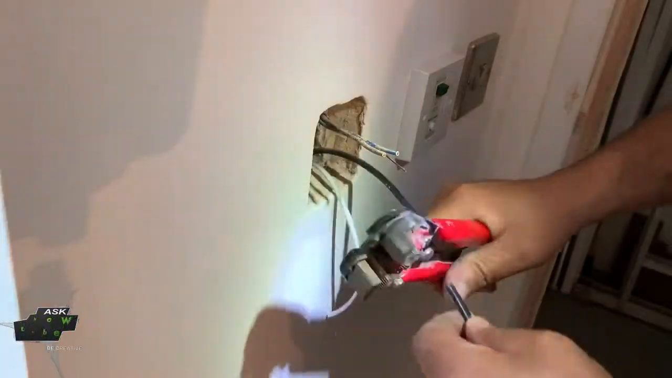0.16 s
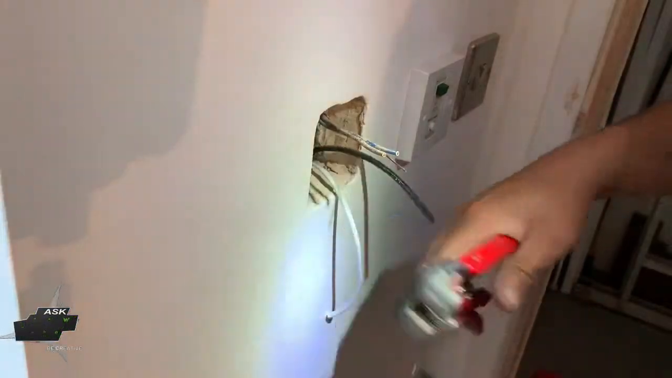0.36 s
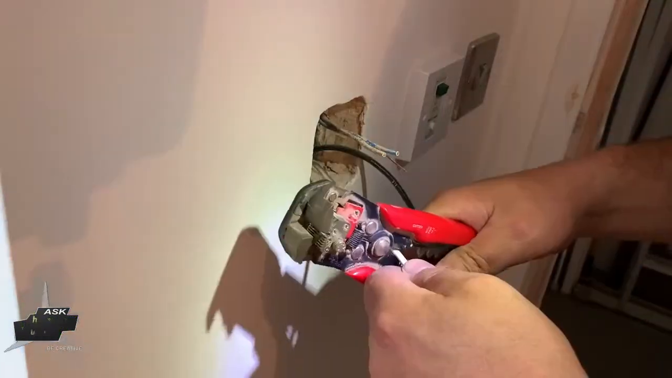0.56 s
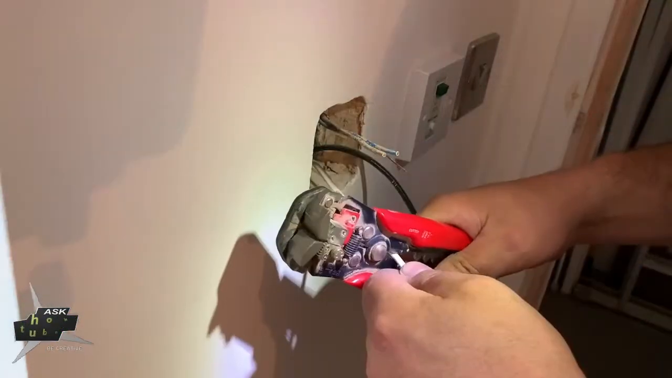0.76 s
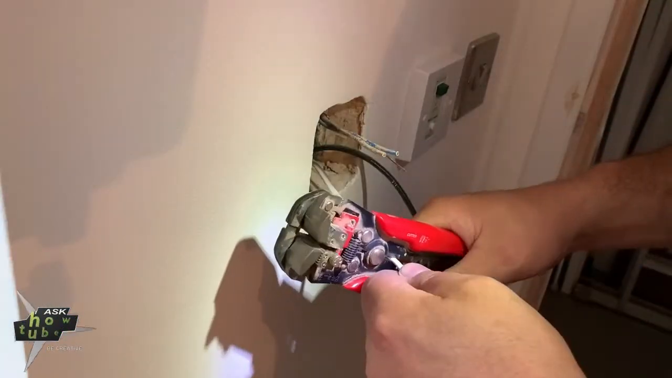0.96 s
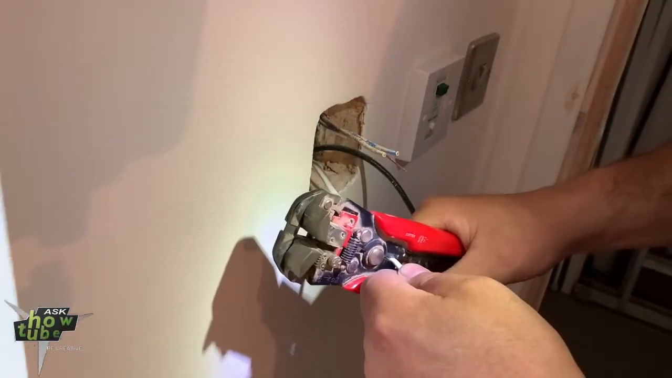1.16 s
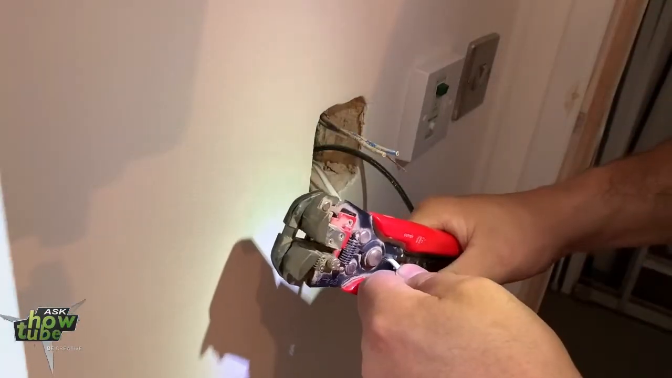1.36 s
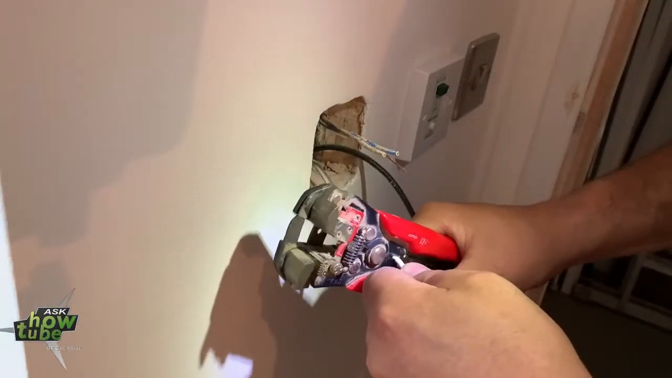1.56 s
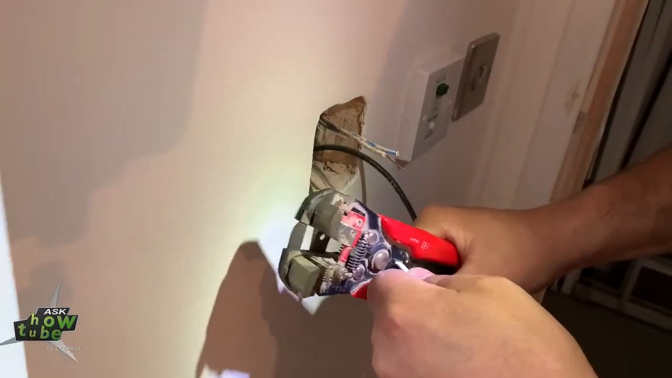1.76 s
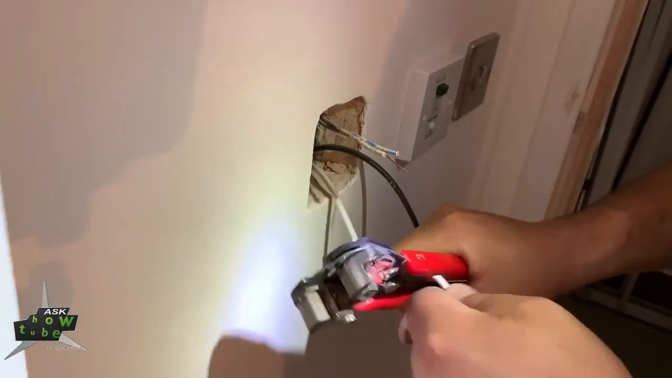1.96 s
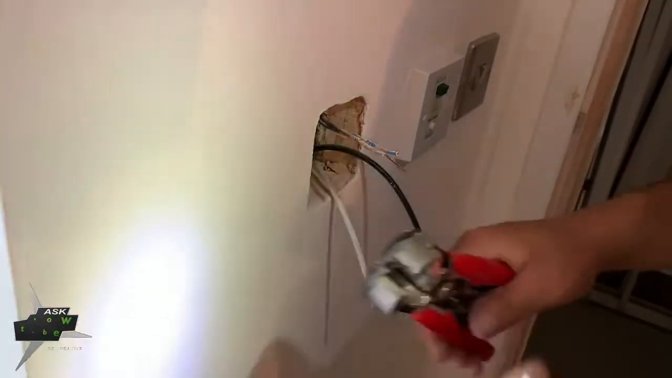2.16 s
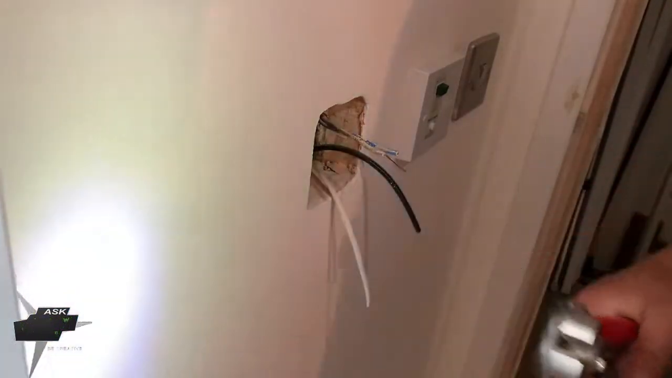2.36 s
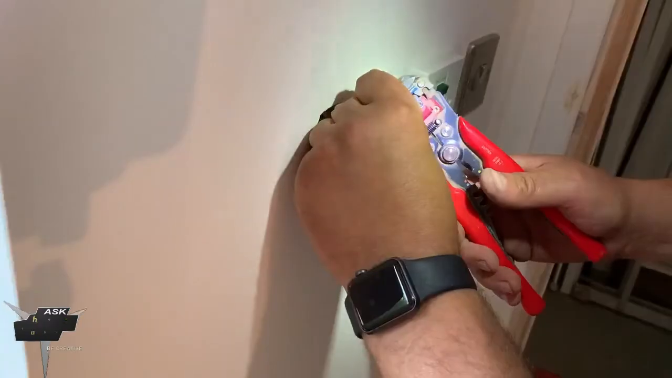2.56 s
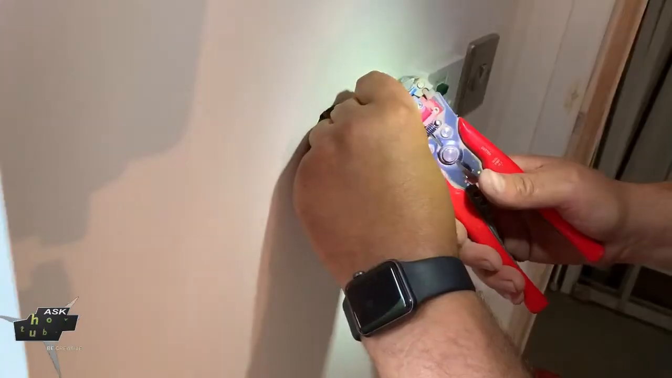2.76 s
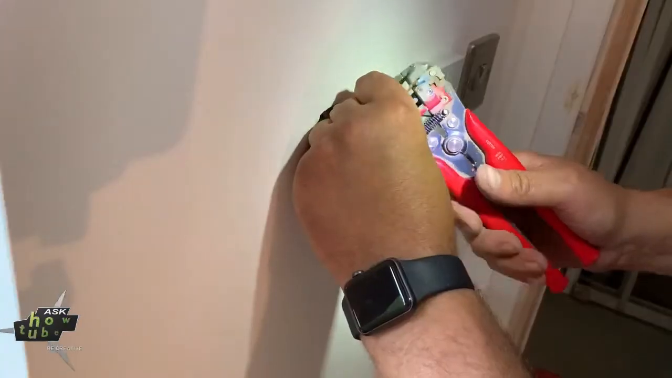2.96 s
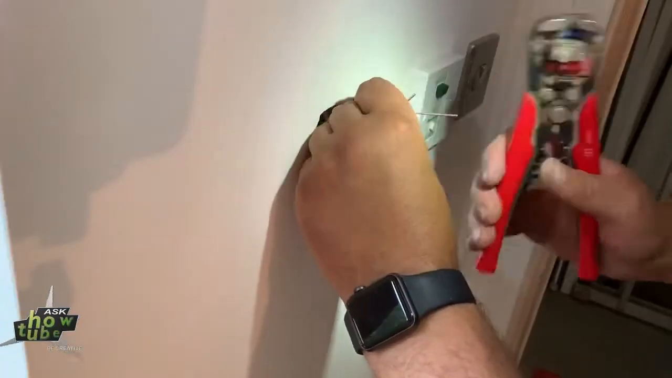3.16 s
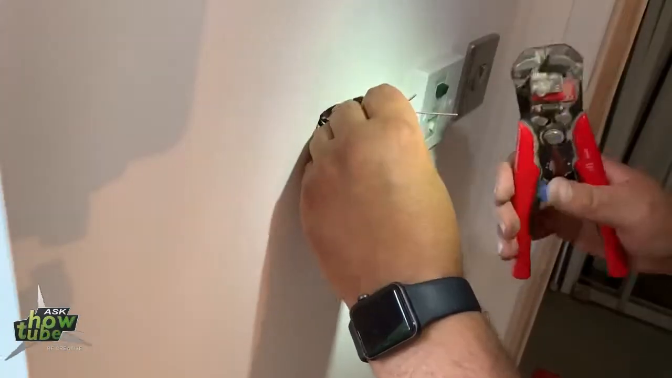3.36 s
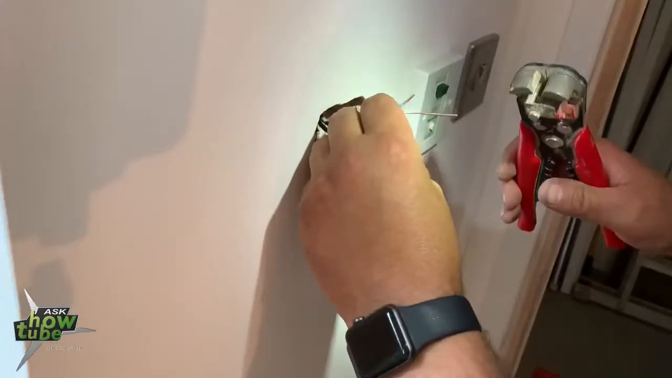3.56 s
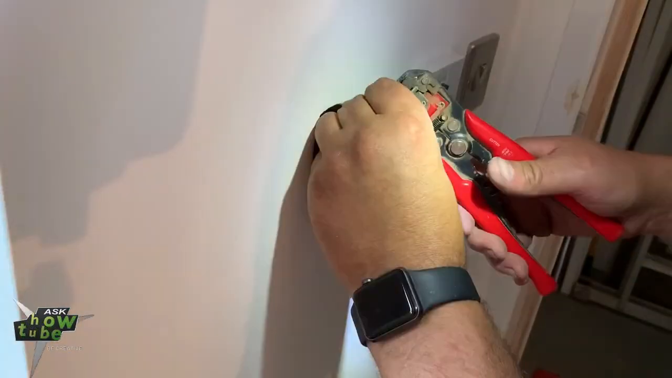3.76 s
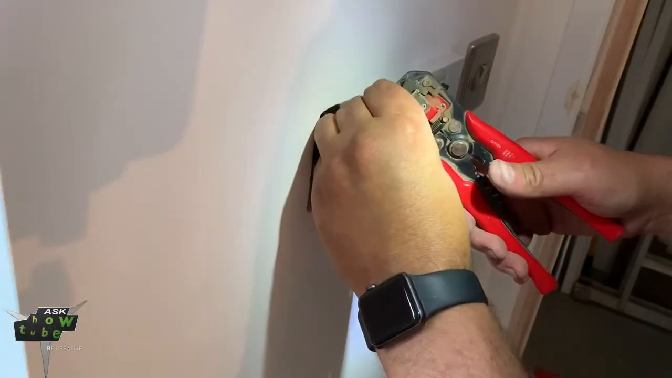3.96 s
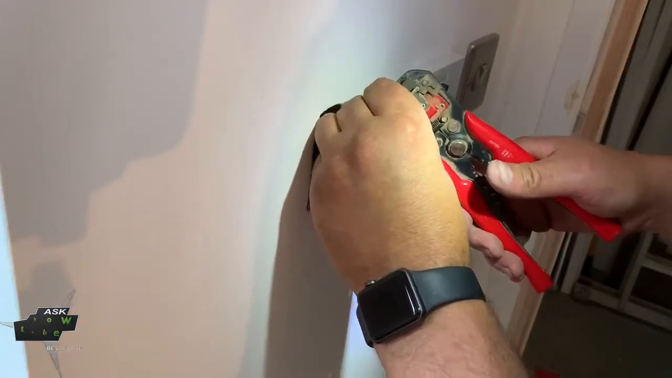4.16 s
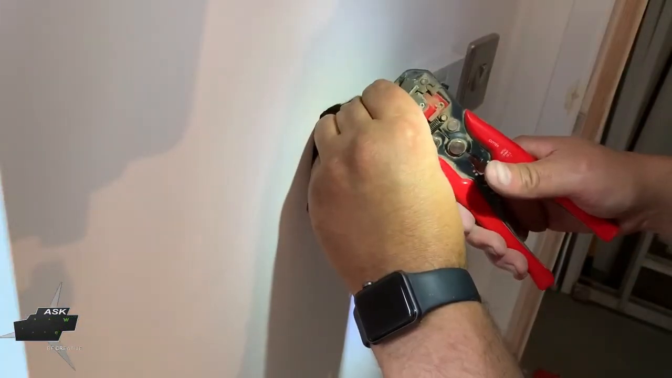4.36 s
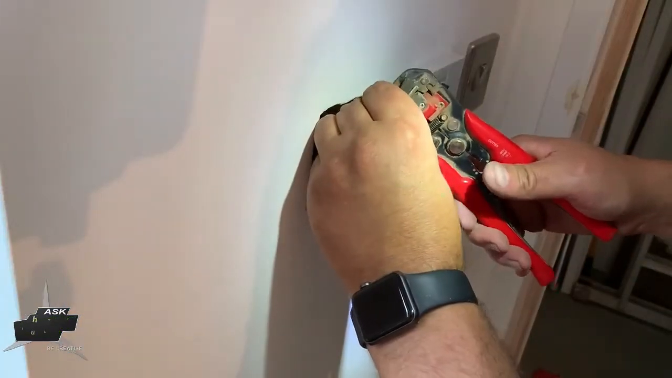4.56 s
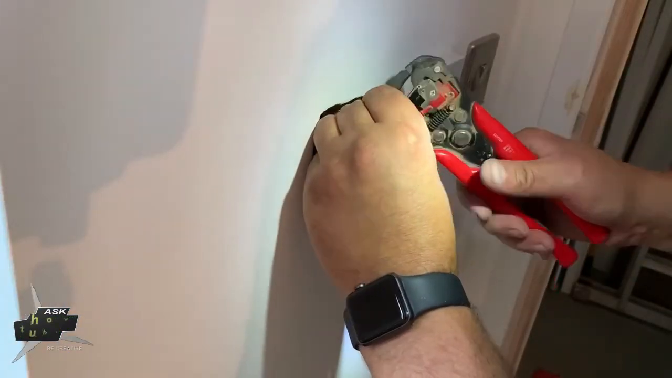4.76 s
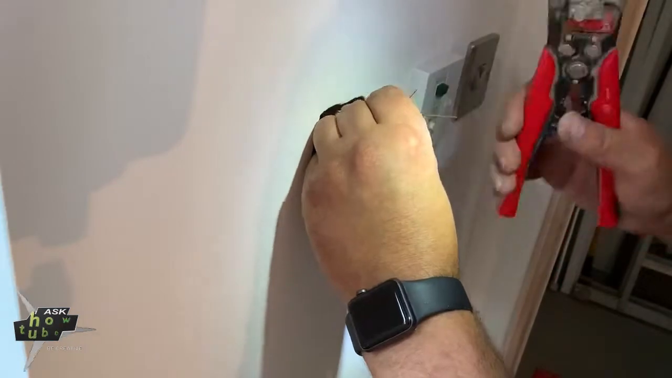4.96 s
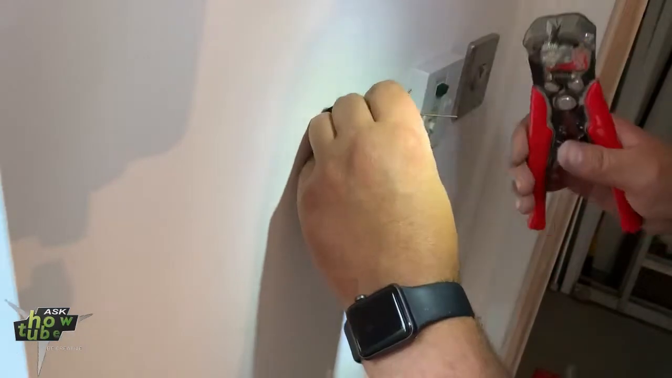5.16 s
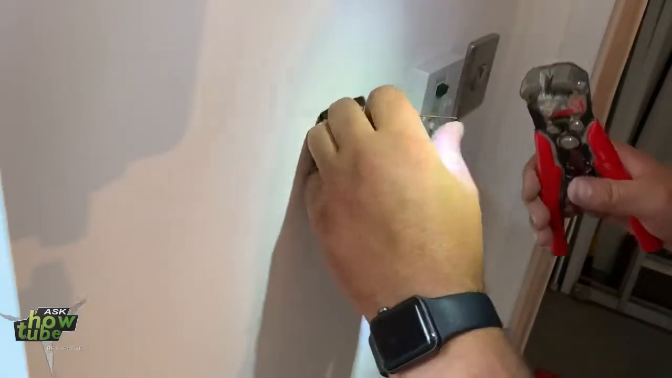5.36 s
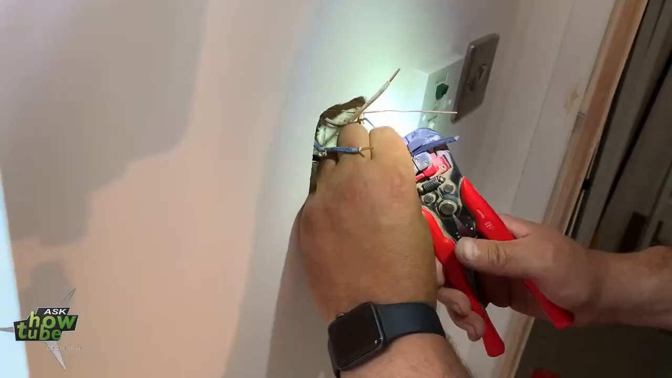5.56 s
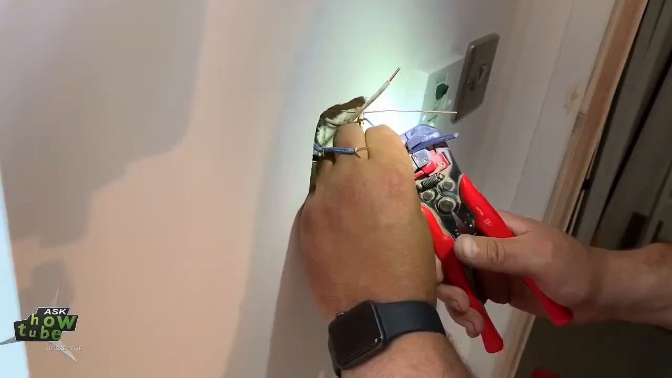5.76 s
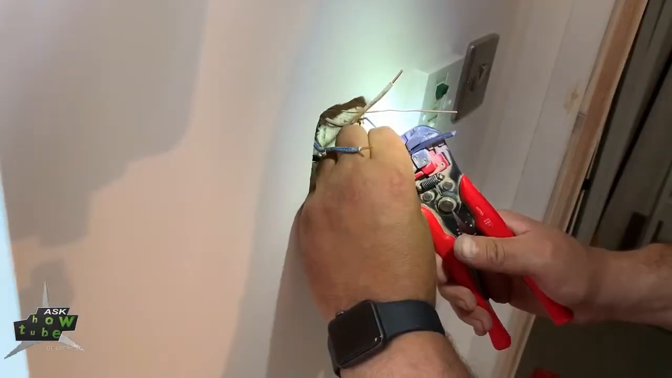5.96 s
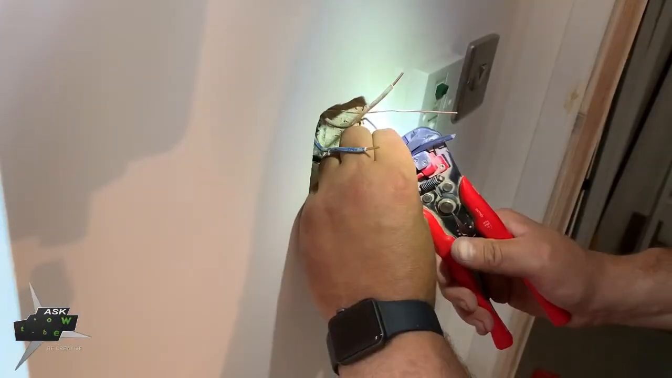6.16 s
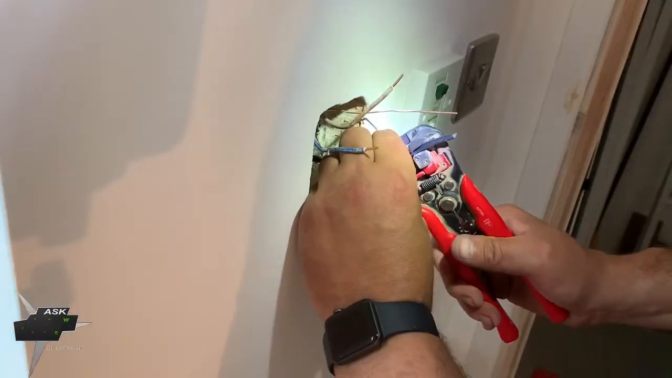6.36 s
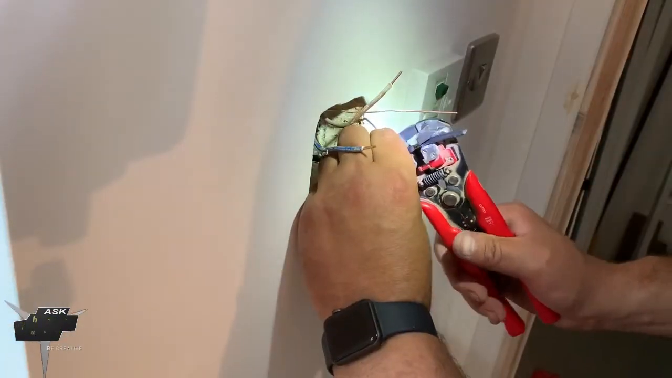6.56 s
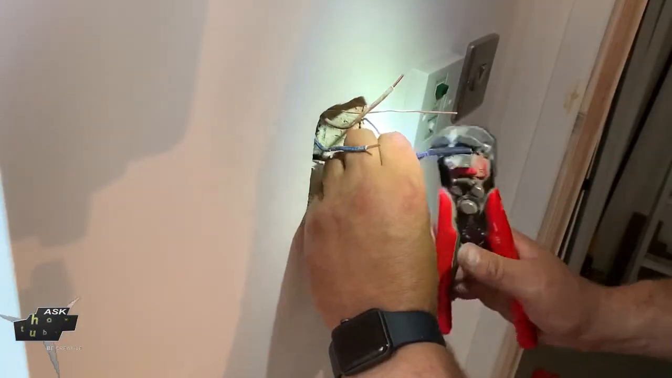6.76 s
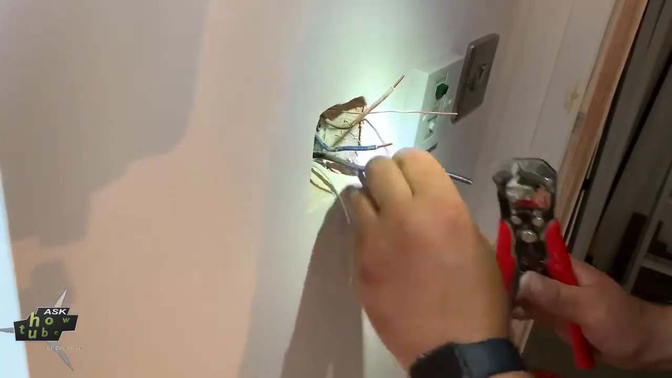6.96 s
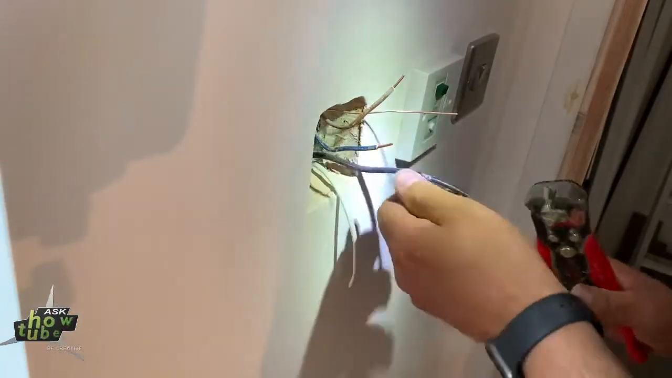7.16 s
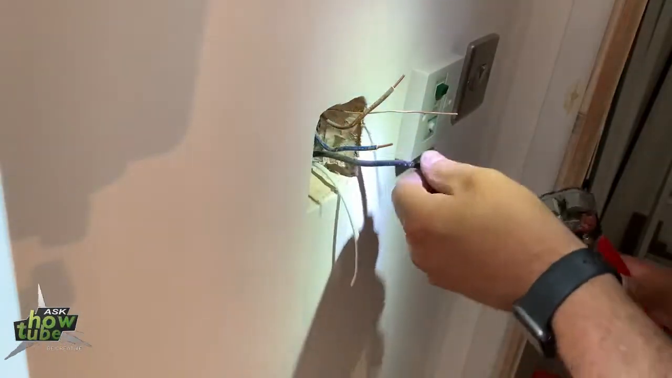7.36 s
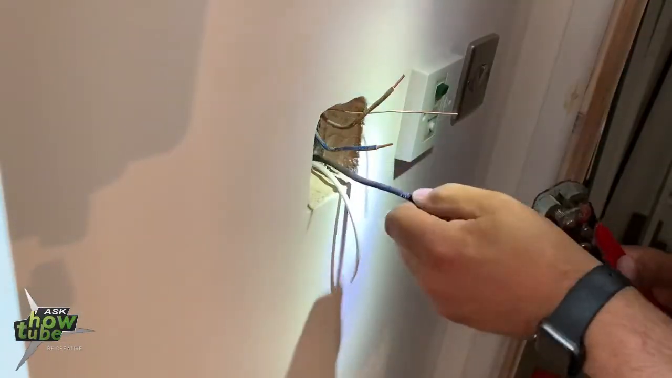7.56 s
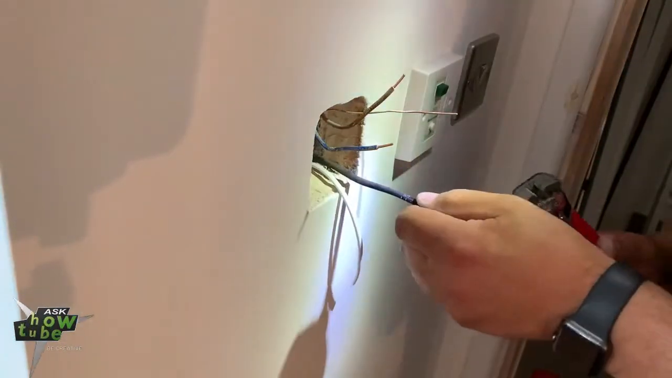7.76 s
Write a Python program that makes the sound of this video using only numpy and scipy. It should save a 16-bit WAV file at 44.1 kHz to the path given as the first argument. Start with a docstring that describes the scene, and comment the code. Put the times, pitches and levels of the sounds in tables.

```python
"""Wire stripper at a wall box

An automatic wire stripper works on cables in a bare room, close to a handheld camera.
The insulation gives way with a snap, and sprung steel jaws clack and rattle: short pulses that set off damped tones.
Cables scrape in the box as grainy noise, over camera rumble, rubbing hands, a faint squeak and a hiss.
It opens on the fading echo of a clack; three hard cuts then split the sound, and each ends the room's ring."""
import sys
import numpy as np
from scipy import signal
from scipy.fft import rfft, irfft
from scipy.io import wavfile

SR = 44100
rng = np.random.default_rng(int(sys.argv[2]) if len(sys.argv) > 2 else 0)


def inscribe(sig):
    """Save sig as 16-bit PCM at rate SR to the path in sys.argv[1].

    A 1-D sig is mono; a 2-D sig holds one channel per row.
    Samples are clipped to [-1, 1] before scaling.
    """
    pcm = np.round(np.clip(np.atleast_2d(sig).T, -1, 1) * 32767)
    wavfile.write(sys.argv[1], SR, pcm.astype(np.int16))


N = 343980

# Moments of the hard cuts: cut_s
CUT_TIMES = [.567, 2.5, 5.567]
# The insulation gives way (crack) and the jaws fly to their stop; levels are before the common gains:
# start_s, crack_db, flight_s, stop_db, body_db, top_db, jolt_db, thunk_db (thunk against the jolt)
WIRE_SNAPS = [(1.5950, -4, 0.0073, -15, -1.5, -5, -27.5, 3.5), (2.9618, -6, .012, 0, 7.5, 0, -21, 3),
              (4.7237, -9, .0135, -1, 8, 0.5, -23, 0.5), (5.541, -15.5, .0145, -18, 10, -0.5, -24, -19),
              (6.46, -13, .007, -28, -1, 12.5, -29, -27)]
# Steel parts meet as the jaws spring back or the tool is turned; levels are before the common gains:
# start_s, level_db, body_db, top_db, chatter_db (against the clack)
STEEL_CLACKS = [(0.053, -13.5, -2.5, -0.5, -9.5), (0.0815, -5, -14, 1, -20.5),
                (0.0922, -5.5, -7.5, -3.5, -19), (0.128, -23.5, 7.5, 6.5, -13), (0.2043, -9, 4, -3.5, -7),
                (0.2952, -9, -1.5, -2.5, -22), (0.3104, -9.5, -9, -1, -16.5), (0.324, -2.5, -4.5, 0.5, -19),
                (0.3507, -5.5, -8.5, 3.5, -5.5), (0.3604, -9, 8, -3.5, -19.5), (0.589, -39, 28.5, -3, -19),
                (0.614, -35, 17.5, 7, -19), (0.6461, -32.5, 16, -5, -30), (0.7829, -10.5, 1, 1, -32),
                (0.9107, -25.5, 12.5, -2, -16.5), (1.8846, -15.5, 6.5, -1, -10.5),
                (2.0207, -3, -6.5, -13.5, -24.5), (2.033, -10, 0.5, 4.5, -21), (2.052, -6.5, 5.5, 14, -20),
                (2.2598, -9, 0.5, 1, -0.5), (3.1047, -3.5, 4.5, 4.5, -18),
                (3.1305, -3.5, -14.5, 0.5, -23.5), (3.157, -7, 12.5, 9.5, -9), (3.1619, -5.5, -3, 5, -7),
                (4.341, -35.5, 10, -10.5, -17), (4.3555, -29, 3, -3.5, -21), (4.771, -14, -1.5, 9, -10.5),
                (4.8436, -0.5, -2, 4.5, -25), (4.871, -15, -4, -18.5, -14.5), (4.8808, -1.5, -6.5, 10, -17),
                (4.92, -9, 5, 0.5, -3), (4.929, -10, -21.5, 7.5, -8.5), (6.2968, -42, -14, 23, 3.5),
                (6.437, -36.5, 5, -3, -4.5), (6.4962, -22, -22, 8.5, -3.5), (6.624, -33, 9, -20, -9),
                (6.6362, -18.5, 10.5, -21.5, -15.5), (6.6614, -15.5, 5.5, -3, -9),
                (6.6847, -8.5, 6.5, 6.5, -0.5), (6.8603, -25, 6, 12.5, -24)]


def from_db(db):
    """Turns decibels into an amplitude factor."""
    return 10 ** (np.asarray(db) / 20)


def rms_one(x):
    """Scales a sound to an rms of 1."""
    return x / np.sqrt(np.mean(x ** 2) + 1e-20)


def at_hz(points, hz, axis=1):
    """Reads one column of a table on a log-frequency axis."""
    points = np.array(points)
    return np.interp(np.log(np.maximum(hz, 1)), np.log(points[:, 0]), points[:, axis])


def colour(x, spectrum, body_db=0, top_db=0, size=8192):
    """Filters with a unit-energy, minimum-phase response whose body (lows) and top can be lifted or lowered."""
    hz = np.fft.rfftfreq(size, 1 / SR)
    tilt_db = np.interp(hz, [2500, 5500, 8000, 13000], [body_db, 0, 0, top_db])
    db = at_hz(spectrum, hz) + tilt_db
    # folding the cepstrum onto positive times makes the filter act only after its input
    cepstrum = irfft(np.log(from_db(db)))
    index = np.arange(size)
    folded = 2 * cepstrum * (index < size // 2) - cepstrum * (index == 0)
    response = irfft(np.exp(rfft(folded)))
    return signal.fftconvolve(x, response / np.linalg.norm(response))[:len(x)]


def lift_treble(x, hz, db):
    """Raises or lowers what lies above a frequency by adding a share of the high-passed sound."""
    treble = signal.lfilter(*signal.butter(1, hz, "high", fs=SR), x)
    return x + (from_db(db) - 1) * treble


def ring(x, modes):
    """A force sets off damped sines, each losing 60 dB in its own decay time."""
    out = 0
    for hz, db, t60_s in modes:
        r = from_db(-60 / (t60_s * SR))  # loss per sample
        w = 2 * np.pi * hz / SR  # turn per sample
        tone = signal.lfilter([1, -r * np.cos(w)], [1, -2 * r * np.cos(w), r * r], x + 1e-18)
        out = out + from_db(db) * tone
    return out


def ring_between_cuts(x, modes):
    """Damped sines that start afresh in each stretch, so their ringing ends at each cut."""
    stretches = np.split(x, [round(s * SR) for s in CUT_TIMES])
    return np.concatenate([ring(stretch, modes) for stretch in stretches])


def grit(envelope, spread_db):
    """Noise grains of uneven size under an envelope, carrying the envelope's energy."""
    size = len(envelope)
    swings = np.repeat(rng.standard_normal(size // 20 + 1), 20)[:size]
    grains = rng.standard_normal(size) * from_db(spread_db * swings)
    force = grains * envelope
    return force * np.linalg.norm(envelope) / (np.linalg.norm(force) + 1e-20)


def scatter(size, width_hz, count):
    """A unit pulse smeared by bending waves: all-pass sections delay each pitch by a different time."""
    r = np.exp(-np.pi * width_hz / SR)
    angles = np.pi * (np.arange(count) + rng.uniform(-0.88, 2, count)) / count
    turns = -2 * r * np.cos(angles)
    sections = [[r * r, a, 1, 1, a, r * r] for a in turns]
    return signal.sosfilt(sections, signal.unit_impulse(size) + 1e-18)


def add(track, s, sound):
    """Lays a sound into a track at a time in seconds."""
    start = max(round(s * SR), 0)
    track[start:start + len(sound)] += sound[:max(N - start, 0)]


def air(spectrum, side_db):
    """Steady stereo noise: a middle part of rms 1 plus a side part of opposite sign left and right."""
    mid = rms_one(colour(rng.standard_normal(N), spectrum))
    side = rms_one(colour(rng.standard_normal(N), spectrum))
    return mid + from_db(side_db) * side * np.array([[1], [-1]])


def hiss():
    """A faint, steady, wide noise."""
    # Colour of the hiss: pitch_hz, level_db (per Hz)
    hiss_colour = [(30, -0.5), (300, 1.5), (600, -4.5), (1200, -10.5), (2600, -11), (4000, -17),
                   (7500, -23), (10500, -19), (16000, -25.5)]
    return from_db(-64.5) * air(hiss_colour, side_db=1.5)


def handling(lump_db=1.74, lump_s=.08):
    """Rumble of the hand on the camera, as the grip tightens and eases in small uneven lumps."""
    # Colour of the rumble: pitch_hz, level_db (per Hz)
    rumble_colour = [(15, -24), (28, -6.5), (52, 1.5), (80, -2), (125, -8.5), (220, -8.5), (290, -18.5),
                     (450, -36.5), (900, -55.5), (3000, -79)]
    # Strength of the rumble before lumps and left-right balance: time_s, level_db
    grip_levels = [(0.0, -52), (0.19, -47.5), (0.5, -50), (0.56, -42.5), (2.35, -48.5), (2.71, -44),
                   (2.74, -51), (3.02, -41.5), (3.19, -51.5), (4.69, -45.5), (4.74, -38), (4.93, -55.5),
                   (5.32, -48.5), (6.15, -54.5), (6.58, -44.5), (6.73, -50), (7.28, -47.5), (7.8, -51.5)]
    t, steps = np.arange(N) / SR, np.arange(0, N / SR + lump_s, lump_s)
    noise = air(rumble_colour, side_db=-12.5) * from_db([[.6], [-.6]])  # a little stronger on the left
    lumps = np.interp(t, steps, rng.standard_normal(len(steps)))
    level_db = np.interp(t, *np.transpose(grip_levels)) + lump_db * lumps
    return from_db(level_db) * noise


def rustle():
    """Hands shift on the plastic grips: rubbing skin makes noise in soft swells."""
    # Colour of the rustle: pitch_hz, level_db (per Hz)
    rustle_colour = [(150, -19), (500, -3), (1000, 5.5), (1700, -9.5), (2800, -1.5), (4200, -18),
                     (16000, -35.5)]
    # Swells of rubbing: peak_s, level_db (of the middle part), width_s
    rubs = [(2.64, -67, 0.032), (3.82, -65.5, 0.034), (4.0, -67.5, 0.057), (4.29, -69.5, 0.036),
            (4.54, -72, 0.0352), (6.02, -68, 0.12), (6.19, -57.5, 0.037)]
    t = np.arange(N) / SR
    swells = sum(from_db(db) * np.exp(-((t - s) / width_s) ** 2 / 2) for s, db, width_s in rubs)
    return swells * air(rustle_colour, side_db=-2)


def room_response(first_echo_s=0.0027, early_db=15.5, early_s=0.007, size=32768):
    """Diffuse echoes, unrelated left and right, strong at first and dying band by band."""
    # Echoes of the room: pitch_hz, t60_s, level_db (against the sound sent into the room)
    room_bands = [(150, 0.26, -1.5), (550, .5, 1), (1300, 0.73, 2), (2800, 0.91, 1), (4300, 0.69, 4),
                  (7350, 0.73, -6.5), (10000, 0.34, -4.5), (15000, 0.68, -15.5)]
    t, out = np.arange(size) / SR, 0
    white = rng.standard_normal((2, 2, size))  # neighbouring bands get unrelated noise
    early = from_db(early_db * np.exp(-t / early_s))
    build_up = early * (1 - np.exp(-(t / first_echo_s) ** 2))
    edges = np.geomspace(90, 18000, 17)
    for k, (low, high) in enumerate(zip(edges, edges[1:])):
        hz = np.sqrt(low * high)
        band = signal.butter(2, [low, high], "band", fs=SR, output="sos")
        decay = np.exp(-np.log(1000) * t / at_hz(room_bands, hz))
        echoes = signal.sosfilt(band, white[k % 2]) * build_up * decay
        echoes = echoes / np.linalg.norm(echoes, axis=1, keepdims=True)
        band_share = np.sqrt(2 * (high - low) / SR)
        out = out + echoes * band_share * from_db(at_hz(room_bands, hz, axis=2))
    return out


def late(x, lag_samples=7.8):
    """Delays by the travel time between the camera's two ports, a fraction of a millisecond."""
    return irfft(rfft(x) * np.exp(-2j * np.pi * np.fft.rfftfreq(N) * lag_samples), N)


def in_room(clacks, thuds, radiated, count=3):
    """Clacks reach the left port late, thuds both together; echoes change as the tool moves and end at cuts."""
    out = np.array([late(clacks), clacks]) * from_db([[-.4], [.4]]) + thuds
    cuts = [0] + [round(s * SR) for s in CUT_TIMES] + [N]
    for start, end in zip(cuts, cuts[1:]):
        # each stretch has a few tool positions, each with its own echo pattern
        poses = np.linspace(start, end, count + 1).astype(int)
        for a, b in zip(poses, poses[1:]):
            tail = signal.fftconvolve(radiated[None, a:b], room_response(), axes=1)[:, :end - a]
            out[:, a:a + tail.shape[1]] += tail
    return out


def squeak(start_s=5.57, length_s=0.13, from_hz=10900, to_hz=9300, glide_s=0.058):
    """A faint thin tone swells and fades while its pitch slides down."""
    out, t = np.zeros(N), np.arange(int(length_s * SR)) / SR
    hz = to_hz + (from_hz - to_hz) * np.exp(-t / glide_s)
    swell = np.sqrt(np.sin(np.pi * t / length_s))
    tone = np.sin(2 * np.pi * np.cumsum(hz) / SR)
    add(out, start_s, from_db(-62) * swell * tone)
    return out


def cable_and_first_echo(treble_hz=6000, bump_db=-5, thud_db=13):
    """Sliding insulation sticks and slips in fine grains, as does an opening echo; the cable thuds on the box."""
    # Colours of the sliding cable and of the box: pitch_hz, level_db (per Hz)
    cable_colour = [(80, -19), (200, 6), (400, 1.5), (700, -1.5), (1400, -5), (3000, -9.5), (5000, -14),
                    (8500, -10.5), (12000, -16.5), (16000, -29)]
    box_colour = [(60, -21), (200, -6), (420, 7), (650, 0), (900, -11), (1400, -19.5), (2500, -22.5),
                  (10000, -37.5)]
    # Cable and jaws sliding; the first row is the fading echo of a clack before the start:
    # peak_s, level_db (before colouring), rise_s, fall_s, treble_db
    grainy_swells = [(.005, -42, .04, 0.061, 18), (.14, -42.5, 0.033, 0.082, -4),
                     (.84, -51.5, 0.028, 0.035, -8.5), (1.597, -56, 0.027, .008, 14.5),
                     (1.92, -39.5, 0.011, 0.013, -10), (6.49, -49, 0.022, 0.014, 13),
                     (6.899, -48.5, .02, 0.049, -20), (7.149, -52.5, 0.072, 0.056, 3.5),
                     (7.314, -39.5, 0.033, 0.03, 3.5), (7.66, -61.5, .08, 0.24, -22.5)]
    # The cable bumps the box: start_s, level_db (before the common gains), drag_s (fade of the drag)
    bumps = [(4.286, -49, 0.021), (6.459, -33, 0.01), (6.893, -44, 0.014), (6.968, -48.5, 0.054),
             (7.246, -25.5, 0.002), (7.276, -38, 0.0072)]
    grains, knocking, t = np.zeros(N), np.zeros(N), np.arange(SR // 2) / SR
    for s, db, rise_s, fall_s, treble_db in grainy_swells:
        start = max(s - 3 * rise_s, 0)
        since = t + start - s
        envelope = np.exp(-np.where(since < 0, (since / rise_s) ** 2 / 2, since / fall_s))
        swell = lift_treble(grit(envelope, spread_db=-0.5), treble_hz, treble_db)
        add(grains, start, from_db(db) * swell)
    for s, db, drag_s in bumps:
        # the first touch, then a short drag
        thud = from_db(thud_db) * scatter(len(t), width_hz=300, count=30)
        drag = from_db(bump_db) * grit(np.exp(-t / drag_s), spread_db=3)
        add(knocking, s, from_db(db) * (thud + drag))
    return colour(grains, cable_colour) + colour(knocking, box_colour)


def knocks():
    """Dull blows through the handles (start_s, jolt_db, thunk_db): two to a snap, a slight one to a clack."""
    lead_s = .0015  # in a snap the handles give just before the steel sounds
    for s, crack_db, flight_s, stop_db, _, _, jolt_db, thunk_db in WIRE_SNAPS:
        yield s - lead_s, jolt_db, thunk_db
        yield s + flight_s - lead_s, jolt_db - 4 + stop_db - crack_db, thunk_db + 5
    for s, db, body_db, _, _ in STEEL_CLACKS:
        # the fuller the clack's body, the stronger the jolt
        yield s, db - 28.5 + 0.92 * body_db, -6


def handles(jolt_db=10, tear_db=-5, tear_s=.006, lever_db=-4, handle_db=2):
    """The sudden release of the squeeze jolts the lever with a short tearing noise; the handles thunk."""
    # Colour of the handles: pitch_hz, level_db (per Hz)
    handle_colour = [(60, -6), (200, -2.5), (400, -3), (620, -1), (1000, 4), (1400, -1), (3000, 6),
                     (5000, -19.5), (9000, -13), (16000, -17)]
    # Ringing of lever and handles, before their common gains: pitch_hz, level_db, t60_s
    lever_tones = [(770, -33, 0.013), (1970, -23, 0.02), (2090, -30.5, 0.041)]
    handle_tones = [(337, -34.5, 0.022), (399.4, -24, 0.04), (464, -35.5, 0.095), (3010, -32.5, 0.08),
                    (3045, -31, 0.065), (3180, -28, 0.087), (3440, -39, 0.11), (3560, -38, 0.065)]
    force, shove, t = np.zeros(N), np.zeros(N), np.arange(SR // 5) / SR
    for s, db, thunk_db in knocks():
        jolt = from_db(db + jolt_db) * scatter(len(t), width_hz=1100, count=30)
        tear = from_db(db + tear_db) * grit(np.exp(-t / tear_s), spread_db=3)
        add(force, s, jolt + tear)
        add(shove, s, from_db(thunk_db) * jolt)
    lever = from_db(lever_db) * ring(force, lever_tones)
    thunks = from_db(handle_db) * ring_between_cuts(shove, handle_tones)
    return colour(force, handle_colour) + lever + thunks


def contacts():
    """Every meeting of steel (start_s, level_db, body_db, top_db, chatter_db): crack and stop, clack and bounce."""
    for s, crack_db, flight_s, stop_db, body_db, top_db, _, _ in WIRE_SNAPS:
        yield s, crack_db, body_db, top_db, -11
        yield s + flight_s, stop_db, 0.5, top_db, -14
    for s, db, body_db, top_db, chatter_db in STEEL_CLACKS:
        yield s, db, body_db, top_db, chatter_db
        # loose links bounce once, weaker and with a little less body
        bounce_s = .011 * np.exp(0.32 * rng.standard_normal())
        yield s + bounce_s, db - 18, body_db - 2, top_db, -13


def jaws(chatter_s=0.0053, level_db=12.5, chatter_gain_db=-14, late_s=.0002):
    """Each clack is a hard pulse spread over about a millisecond; loose links chatter and the steel rings."""
    # Colour of the steel: pitch_hz, level_db (per Hz)
    steel_colour = [(200, -23.5), (600, -32), (850, -19.5), (1300, -15), (2500, -7), (4000, -3.5),
                    (5500, -0.5), (7000, 3.5), (8400, 7.5), (10500, 3), (12500, -1), (15000, 0.5),
                    (16500, -27.5)]
    # Ringing of the jaws, before its common gain: pitch_hz, level_db, t60_s
    jaw_tones = [(3800, -43, 0.031), (6050, -50.5, 0.061), (7185, -36, 0.055), (9700, -36, .03),
                 (10710, -37.5, 0.023), (11360, -39, 0.033), (11170, -31.5, .06)]
    force, t = np.zeros(N), np.arange(SR // 20) / SR
    settle = (1 - np.exp(-t / 0.00079)) * np.exp(-t / chatter_s)
    for s, db, body_db, top_db, chatter_db in contacts():
        pulse = scatter(len(t), width_hz=430, count=22)
        chatter = from_db(chatter_db + chatter_gain_db) * grit(settle, spread_db=7)
        clack = colour(pulse + chatter, steel_colour, body_db, top_db, size=1024)
        add(force, s + late_s, from_db(db + level_db) * clack)
    return force + ring_between_cuts(force, jaw_tones) * from_db(-11.5)


def scene():
    """Tool and cable in the room, over the camera's rumble, rubbing hands and a faint hiss."""
    clacks, jolts, wire = jaws() + squeak(), handles(), cable_and_first_echo()
    # the hand shields handles and cable, which are heard mostly by way of the room
    thuds = from_db(-2.5) * jolts + from_db(-2.5) * wire
    radiated = clacks + from_db(-1.5) * jolts + from_db(2) * wire
    return in_room(clacks, thuds, radiated) + rustle() + hiss() + handling()


def record(dry):
    """The camera feeds both sides with the right port's treble, phase-shifted on the left; it clips and cuts the top."""
    # Range over which the two ports merge into one: the list holds start_hz, end_hz
    merge_range = [6500, 7800]
    # Phase by which the left side leads in the shared treble: pitch_hz, lead_radians
    left_phase = [(6500, 5.9), (8600, 3.14), (13400, -3.14), (16500, -6.6)]
    left, right = dry
    hz = np.fft.rfftfreq(N, 1 / SR)
    shared = np.interp(hz, merge_range, [0, 1])
    turn = np.exp(1j * np.interp(hz, *np.transpose(left_phase)))
    left = left + irfft(shared * (turn * rfft(right) - rfft(left)), N)
    clipped = np.clip([left, right], -1, 1)
    top_cut = signal.ellip(10, .1, 70, 16500, fs=SR, output="sos")  # low-pass at 16500 Hz
    return signal.sosfilt(top_cut, clipped)


dry = scene()
out = record(dry)
inscribe(out)
```